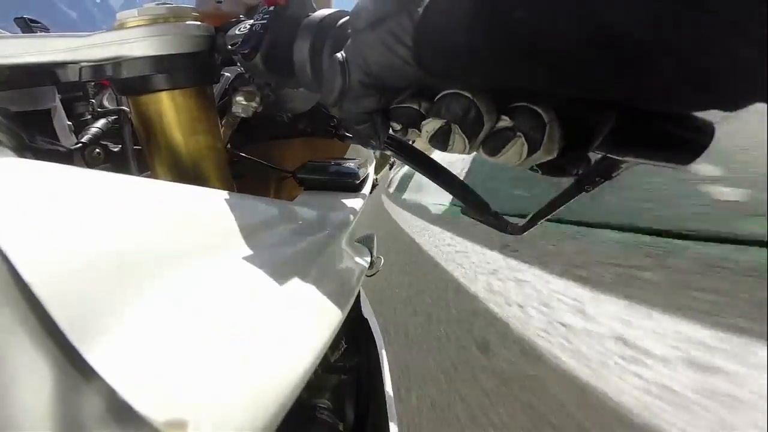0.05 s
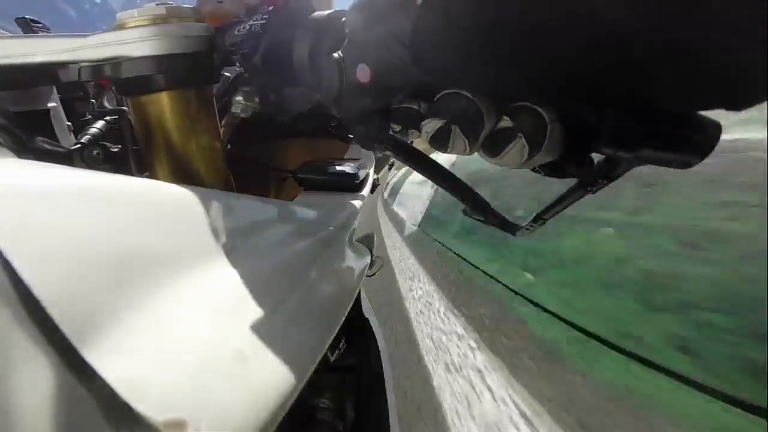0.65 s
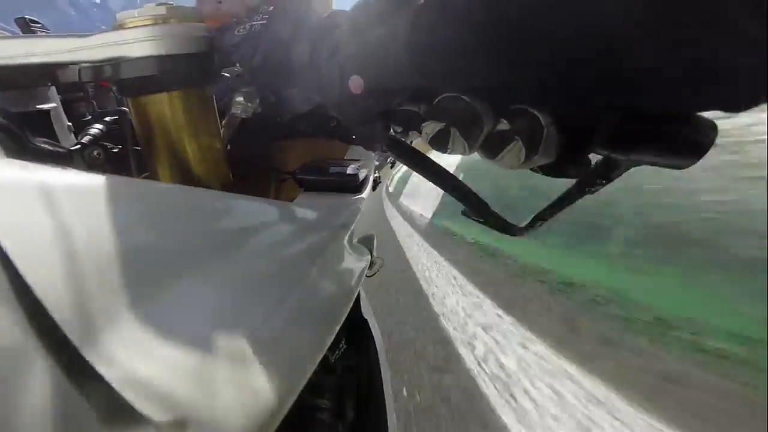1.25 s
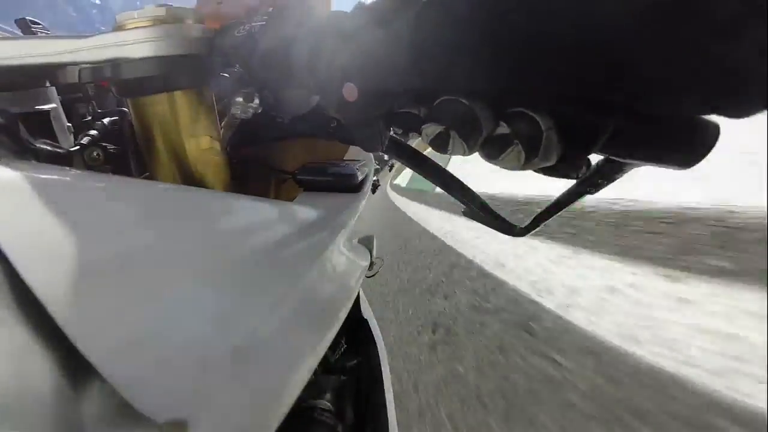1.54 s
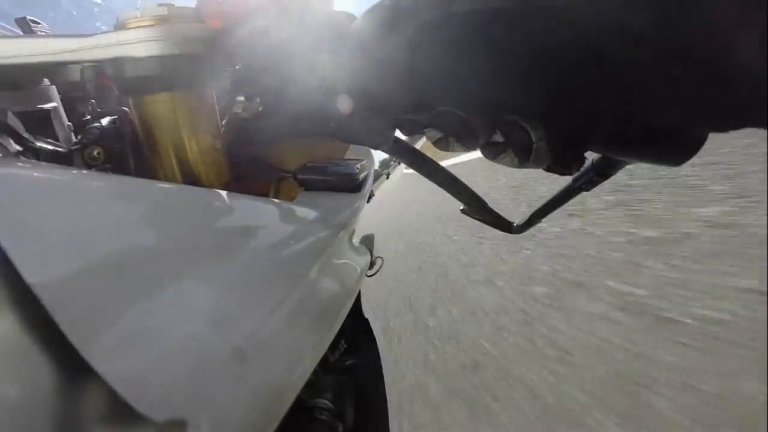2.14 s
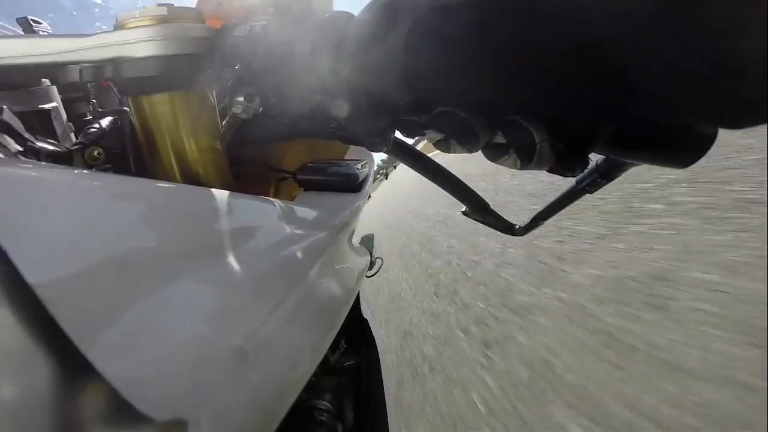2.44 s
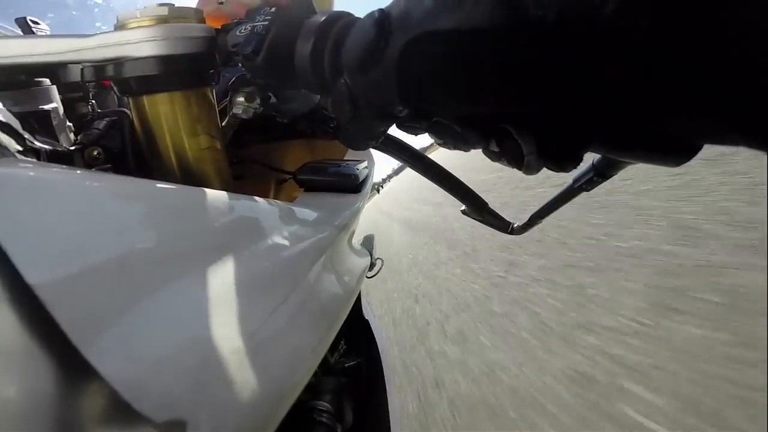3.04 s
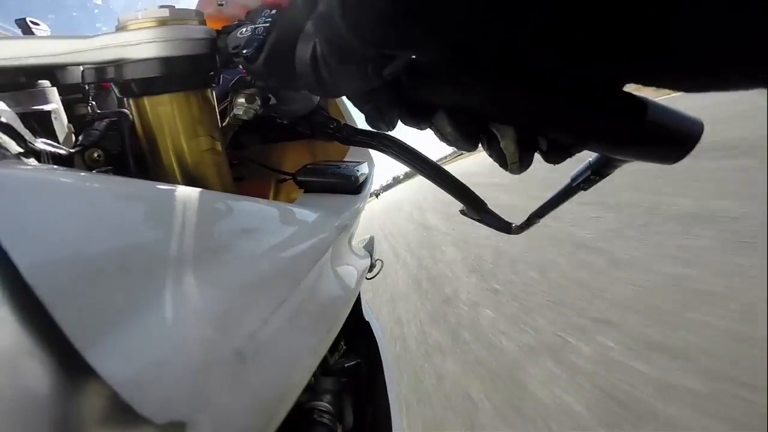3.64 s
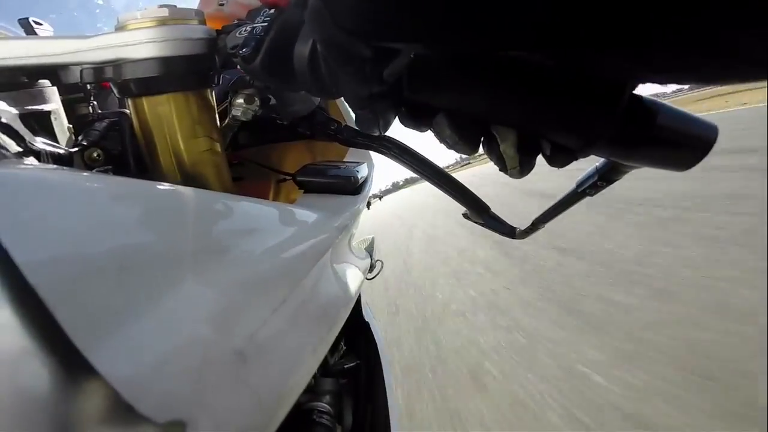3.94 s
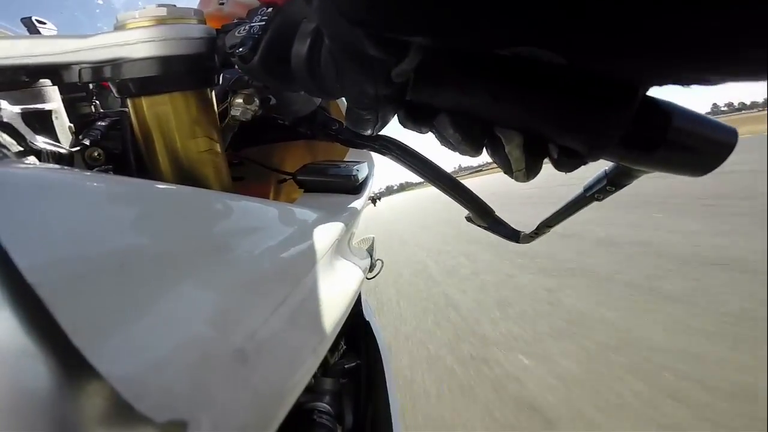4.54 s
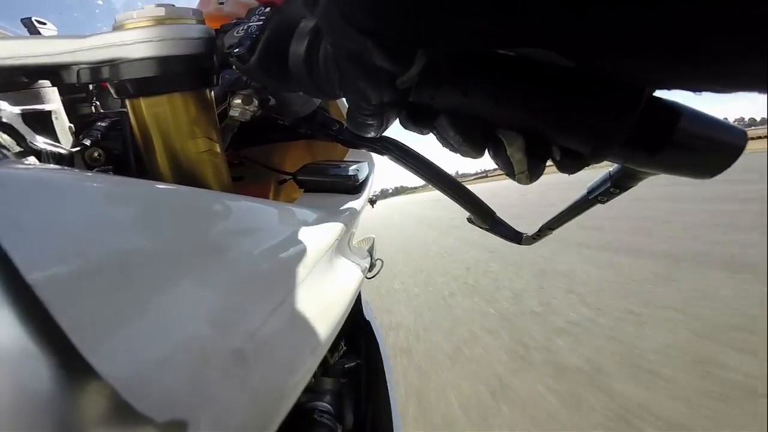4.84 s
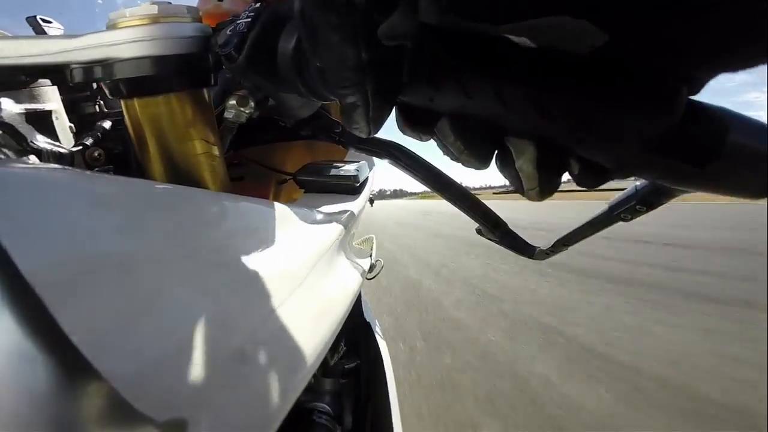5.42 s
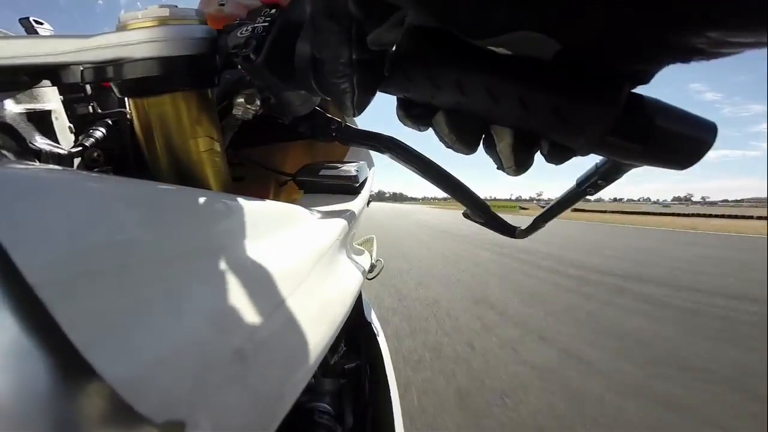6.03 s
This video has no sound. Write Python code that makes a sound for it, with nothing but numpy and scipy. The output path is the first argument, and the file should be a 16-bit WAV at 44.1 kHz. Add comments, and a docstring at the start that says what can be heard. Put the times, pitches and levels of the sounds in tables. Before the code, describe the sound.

On-board sound of a four-cylinder race bike opening up out of a corner, with gear whine, rising revs, a barking upshift and growing wind.

```python
"""A four-cylinder racing motorcycle, heard from its fairing, opens up out of a corner.
It starts on light throttle: valves and gears clatter, and the chassis knocks beside the kerb.
Near 2 s the gears sing as the drive takes up; by 3.3 s the throttle is wide, the airbox howls and rasps,
and wind buffets the microphone. Near 5 s comes one upshift: a dip, a rough bark, and the revs climb again.
A fast limiter holds the peaks down throughout."""
import sys
import numpy as np
from scipy import signal
from scipy.fft import rfft, irfft, next_fast_len
from scipy.io import wavfile
from scipy.ndimage import uniform_filter1d, minimum_filter1d

SR = 44100
rng = np.random.default_rng(int(sys.argv[2]) if len(sys.argv) > 2 else 0)


def log_audio(samples):
    """Write samples as a 16-bit WAV file to the path given in sys.argv[1]."""
    # one column per channel
    frames = np.atleast_2d(samples).T
    # limit to full scale, then quantise
    limited = np.clip(frames, -1, 1)
    pcm = np.round(limited * 32767).astype(np.int16)
    wavfile.write(sys.argv[1], SR, pcm)


N = 276948

# Sub-bass shake of the frame. Each row: frequency in Hz, relative level in dB.
SHAKE_SPECTRUM = [(8, -30), (25, 2.5), (38, 9.5), (55, 1), (110, -49)]
# Chassis knocks beside the kerb. Each row: start in seconds, level in dB.
KNOCKS = [(.241, -17.5), (.832, -20), (.899, -21)]
# Wind bed, building as the bike stands up and gathers speed. Each row: time in seconds, level in dB.
WIND_LEVEL = [(0, -44), (2.5, -47.5), (3.0, -37), (3.45, -31), (4.7, -25.5), (5.25, -30.5), (6.28, -21.5)]
# Single gusts. Each row: start in seconds, level in dB, decay in seconds.
GUSTS = [(0.24, -29, .011), (1.3, -33, .014), (2.8, -32, .014), (2.94, -28, .015), (3.115, -24, .014),
         (3.4, -28, .05), (3.77, -26, .05), (4.13, -26, .04), (5.97, -22, .03)]
# Dark rumble of air on the microphone. Each row: frequency in Hz, relative level in dB.
WIND_SPECTRUM = [(12, -26.5), (30, -3.5), (60, -2), (100, 0), (200, -1), (350, -4.5), (600, -4.5),
                 (1200, -11), (3000, -61.5)]

# The revs. Each row: time in seconds, four-stroke cycles per second.
REVS = [(0.0, 73.9), (0.05, 73.2), (0.75, 74.9), (0.82, 74.2), (0.96, 76.1), (1.01, 74.2), (1.31, 77.1),
        (1.36, 75.9), (1.94, 80.1), (2.17, 79.5), (2.26, 82.0), (2.4, 82.7), (2.48, 85.2), (2.69, 84.9),
        (2.8, 86.3), (2.97, 90.9), (3.02, 89.9), (3.55, 94.6), (3.58, 95.9), (3.88, 95.7), (4.91, 105.2),
        (5.02, 91.8), (5.05, 93.5), (5.25, 94.2), (6.03, 101.1), (6.28, 102.6)]
# The rider's hand. Each row: time in seconds, throttle from 0 to 1, roughness from 0 to 1.
THROTTLE = [(0, 0.07, 0.61), (1.15, .05, .43), (1.9, 0.28, 0.54), (2.15, 0.23, 0.54), (2.28, 0.45, 0.52),
            (2.52, .52, 0.56), (2.69, 0.36, 0.4), (2.92, 0.72, 0.5), (3.17, .85, 0.88), (3.32, 0.94, 0.45),
            (4.2, 0.97, 0.33), (6.28, 0.92, 0.42)]
# Fader for the engine's body and rasp. Each row: time in seconds, level in dB.
ENGINE_LEVEL = [(0, -13.5), (3.4, -13), (4.05, -12), (4.5, -11.5), (5.2, -10.5), (5.8, -11.5), (6.28, -7.5)]
# The uneven beat of the cylinders. Each entry: relative strength of one stroke in dB.
CYLINDER_DB = [3.5, 3.9, 1.9, 0.5]
# Gear whine, loudest as the drive takes up. Each row: time in seconds, level in dB.
WHINE_LEVEL = [(0, -44.5), (1.3, -46.5), (1.7, -37.5), (2.2, -37.5), (2.4, -48), (2.9, -46), (3.3, -58)]
# Notes of the meshing teeth. Each row: multiple of the cycle rate, offset from the whine level in dB.
GEAR_MESH = [(37, 5), (38, 4), (44, -2), (55, -4)]
# Fizz at the very top. Each row: frequency in Hz, relative level in dB.
CRACKLE_SPECTRUM = [(4000, -14), (7000, 2), (9000, -2), (11500, -9.5), (13000, -21.5), (15000, -31),
                    (18000, -42)]
# Bright tick of the valves. Each row: frequency in Hz, relative level in dB.
VALVE_SPECTRUM = [(2500, -16), (3100, 6), (3600, -3.5), (4300, 0), (4600, -4.5), (4950, 4.5), (5500, -8),
                  (6500, 1), (6950, -8), (7600, -22.5), (11000, -51.5), (15000, -65)]
# Ring of the engine cases. Each row: centre in Hz, width in Hz, relative level in dB.
CASE_MODES = [(654, 110, -14.5), (909, 88, -7), (1573, 214, -0.5), (1907, 190, -8.5), (2280, 340, -1),
              (2930, 227, -6.5)]
# Breathy midrange of the intake. Each row: frequency in Hz, relative level in dB.
RUSH_SPECTRUM = [(300, -20.5), (600, -22), (800, -20.5), (950, 0.5), (1130, -9), (1500, -2), (1800, -2.5),
                 (2230, 3.5), (2550, -3.5), (2800, -12), (3300, -11.5), (4200, -18), (7000, -64)]
# Noisy edge of the intake. Each row: frequency in Hz, relative level in dB.
RASP_SPECTRUM = [(2200, -18.5), (3000, 0.5), (3800, -4), (4300, -6), (4750, -2.5), (5300, -5.5),
                 (6400, -4.5), (7000, -10.5), (8000, -20.5), (12000, -39.5)]
# Pitched edge of the intake. Each row: frequency in Hz, relative level in dB.
BUZZ_SPECTRUM = [(2400, -22), (3100, 2), (3800, 3), (4250, -4), (4750, -2), (5300, -15), (5950, -13),
                 (6600, -19), (7500, -36), (12000, -60)]
# Airbox and fairing resonances the tones sweep through. Each row: centre in Hz, width in Hz, boost in dB.
AIRBOX_MODES = [(369, 26, 15.5), (577, 58, -9.5), (927.5, 42, 6), (1424, 116, 13.5), (1505, 40, 6.5),
                (1945, 143, 6), (2346, 553, 18), (2566, 214, 6.5)]
# Peaks and dips of the open intake. Each row: centre in Hz, width in Hz, full-throttle boost in dB.
OPEN_INTAKE_MODES = [(308, 12, 3), (1450, 50, 2), (2060, 90, -6), (2180, 60, 4.5), (2275, 90, 8.5),
                     (2370, 70, -12)]
# The engine's tones. Each row: multiple of the cycle rate, relative dB at shut, half and full throttle.
ENGINE_ORDERS = [(1, -48, -49.5, -42), (2, -43.5, -49.5, -43.5), (3, -41, -43.5, -37), (5, -58.5, -46, -39),
                 (6, -47.5, -49, -35), (7, -42.5, -33, -35.5), (8, -28, -32, -43), (9, -39, -40, -33),
                 (10, -36.5, -59.5, -27), (11, -54.5, -20, -33.5), (12, -35, -40, -33.5),
                 (13, -33, -45, -30), (14, -48, -43, -39), (15, -34.5, -44.5, -35), (16, -51, -37, -40),
                 (17, -43, -35.5, -29.5), (18, -46, -36, -42), (19, -53.5, -33.5, -51),
                 (20, -31, -28, -50.5), (21, -21, -55, -43), (22, -33.5, -33, -40.5), (23, -35, -40, -42),
                 (24, -32.5, -51.5, -45.5), (25, -32.5, -41, -49.5), (26, -36.5, -44.5, -48.5),
                 (27, -40, -42.5, -52.5), (28, -61, -57.5, -41), (29, -40, -49, -75), (30, -39, -49.5, -40),
                 (31, -60.5, -47.5, -45), (32, -46, -47, -50.5), (33, -49.5, -39.5, -40)]

FIRINGS = len(CYLINDER_DB)   # per cycle
CUT_S, CATCH_S = 4.946, 5.01   # the upshift: the ignition is cut, then the engine catches
WAVER_DB, WAVER_HZ = 1.32, 3.4   # each engine tone wavers in level on its own


def from_db(db):
    """Decibels to gain."""
    return 10 ** (np.asarray(db) / 20)


def unit_rms(x):
    """Scale to unit power."""
    return x / np.sqrt(np.mean(x ** 2) + 1e-20)


def running_rms(x, seconds):
    """Smooth level over a short stretch."""
    size = max(int(seconds * SR), 2)
    return np.sqrt(np.abs(uniform_filter1d(uniform_filter1d(x ** 2, size), size)) + 1e-12)


def automation(rows):
    """One curve per column after the time, drawn at every sample."""
    times, *columns = np.transpose(rows)
    return [np.interp(np.arange(N) / SR, times, column) for column in columns]


def drift(rate_hz, step=1):
    """Random wander of spread 1, changing about rate_hz times a second, at every step-th sample."""
    hop, settle = 40, 2000
    pole = np.exp(-2 * np.pi * hop * rate_hz / SR)
    noise = rng.standard_normal(N // hop + settle + 2)
    slow = signal.lfilter([1], [1, -2 * pole, pole * pole], noise)[settle:]
    return np.interp(np.arange(0, N, step) / hop, np.arange(len(slow)), unit_rms(slow))


def swell(centre_s, length_s):
    """A smooth rise from 0 to 1 and back around one instant."""
    return np.exp(-(2 * (np.arange(N) / SR - centre_s) / length_s) ** 2)


def burst(start_s, decay_s, attack_s):
    """Envelope with a straight attack and a dying tail."""
    age = np.arange(N) / SR - start_s
    return np.clip(age / attack_s, 0, 1) * np.exp(-np.maximum(age, 0) / decay_s)


def bell(hz, centre_hz, width_hz):
    """Shape of a resonance, 1 on top."""
    return 1 / (1 + (2 * (hz - centre_hz) / width_hz) ** 2)


def bandpass(x, low_hz, high_hz):
    """Keep one band."""
    return signal.sosfilt(signal.butter(2, [low_hz, high_hz], "band", fs=SR, output="sos"), x)


def colour(x, spectrum):
    """EQ by a smooth spectrum, then scale to unit power."""
    size = next_fast_len(N + SR // 10)
    hz, db = np.transpose(spectrum)
    bin_hz = np.maximum(np.arange(size // 2 + 1) * SR / size, 1)
    gain = from_db(np.interp(np.log(bin_hz), np.log(hz), db))
    return unit_rms(irfft(rfft(x, size) * gain, size)[:N])


def chassis():
    """The frame shakes all the time and thuds over bumps."""
    shake = from_db(-47) * colour(rng.standard_normal(N), SHAKE_SPECTRUM)
    thud = unit_rms(bandpass(rng.standard_normal(N), low_hz=80, high_hz=550))
    knocks = sum(from_db(db) * burst(start, decay_s=0.008, attack_s=0.0012) for start, db in KNOCKS)
    return shake + thud * knocks


def wind(swing_db=2, swing_hz=7.7):
    """Eddies rumble and thump on the microphone port."""
    bed_db, = automation(WIND_LEVEL)
    bed = from_db(bed_db + swing_db * drift(swing_hz))
    gusts = sum(from_db(db) * burst(start, decay, attack_s=0.0024) for start, db, decay in GUSTS)
    return (bed + gusts) * colour(rng.standard_normal(N), WIND_SPECTRUM)


def gear_whine(cycle, wobble_rad=0.99, wobble_hz=16):
    """Meshing teeth sing, wavering with the lash."""
    whine_db, = automation(WHINE_LEVEL)
    whine = 0
    for teeth, db in GEAR_MESH:
        phase = 2 * np.pi * teeth * cycle + wobble_rad * drift(wobble_hz)
        whine = whine + from_db(whine_db + db) * np.sqrt(2) * np.sin(phase)
    return whine


def crackle(cycle_hz, top_db=-44, db_per_hz=0.58, patchy_db=3.5):
    """A fine crackle on top of the rasp grows with the revs."""
    grains = rng.standard_normal(N) * from_db(patchy_db * drift(rate_hz=150))
    level_db = top_db + db_per_hz * (cycle_hz - cycle_hz.max())
    return from_db(level_db) * colour(grains, CRACKLE_SPECTRUM)


def stroke_noise(cycle, sharpness, depth=1):
    """Noise that pulses once per firing, each pulse weighted by its cylinder."""
    firing = cycle * FIRINGS
    strength = from_db(CYLINDER_DB)[firing.astype(int) % FIRINGS]
    pulse = np.exp(sharpness * (np.sin(np.pi * firing) ** 2 - 1))
    return rng.standard_normal(N) * (strength * pulse) ** depth


def valve_tick(cycle):
    """The valve train ticks brightly on every stroke."""
    return colour(stroke_noise(cycle, sharpness=0.95, depth=0.7), VALVE_SPECTRUM)


def case_clatter(cycle, accent=0.16):
    """Valves and gear teeth knock on the cases, hardest once in each cycle."""
    knocks = stroke_noise(cycle, sharpness=0.42) * np.exp(accent * np.cos(2 * np.pi * cycle))
    ring = sum(from_db(db) * bandpass(knocks, hz - width / 2, hz + width / 2)
               for hz, width, db in CASE_MODES)
    return unit_rms(ring)


def intake_rush(cycle):
    """Air rushes into the intake, one gulp per stroke."""
    return colour(stroke_noise(cycle, sharpness=0.99), RUSH_SPECTRUM)


def intake_rasp(cycle, partials=128, spread_db=2.5):
    """The intake's edge: bright noise on every stroke, plus a buzz that repeats every cycle."""
    hiss = colour(stroke_noise(cycle, sharpness=1.0, depth=0.7), RASP_SPECTRUM)
    strengths = from_db(rng.normal(0, spread_db, partials))
    wavetable = irfft(strengths * np.exp(2j * np.pi * rng.random(partials)), n=2048)
    buzz = np.interp(cycle % 1, np.linspace(0, 1, len(wavetable)), wavetable)
    return from_db(-2.5) * hiss + from_db(0.7) * colour(buzz, BUZZ_SPECTRUM)


def firing_note(cycle, cycle_hz, throttle, shut_db=-51, open_boost_db=26, boom_db=8.5):
    """The intake strokes merge into one low note that booms across the lowest airbox resonance."""
    surge_db = 3.5 * burst(CATCH_S, decay_s=0.38, attack_s=0.14)   # extra weight after the shift
    db = shut_db + open_boost_db * throttle + surge_db + WAVER_DB * drift(WAVER_HZ)
    db += boom_db * bell(FIRINGS * cycle_hz, centre_hz=357, width_hz=60)
    return from_db(db) * np.sqrt(2) * np.sin(2 * np.pi * FIRINGS * cycle)


def airbox_howl(cycle, cycle_hz, throttle, rough, bark):
    """Engine orders swell as they cross the resonances; uneven cycles and gear lash blur the high ones."""
    flutter_hz, lash_hz, blur_hz, bark_db = 14.7, 23.8, 2310, 25
    step = 5   # these tones fit in a fifth of the sample rate
    cycle, cycle_hz, throttle, rough, bark = (c[::step] for c in (cycle, cycle_hz, throttle, rough, bark))
    slack = 1 - throttle
    howl = 0
    for order, *levels_db in ENGINE_ORDERS:
        hz = order * cycle_hz
        db = np.interp(throttle, [0, 0.5, 1], levels_db)
        db += sum(boost * bell(hz, centre, width) for centre, width, boost in AIRBOX_MODES)
        db += throttle * sum(boost * bell(hz, centre, width) for centre, width, boost in OPEN_INTAKE_MODES)
        db += bark * bark_db * bell(hz, centre_hz=1815, width_hz=90)
        db += WAVER_DB * drift(WAVER_HZ, step)
        # on light throttle neighbouring orders add up to one throb a cycle; under load they spread out
        lag = 0.018 * order ** 2 + (0.35 + throttle / 2) * rng.uniform(-0.84, 1) / 2
        # with the drive slack, the gears rattle quickly and the cycles alternate
        rattle = drift(lash_hz, step)
        alternation = 0.5 * np.cos(np.pi * cycle + 2 * np.pi * rng.random())
        lash = slack * (rattle + alternation)
        blur = rough * hz / blur_hz
        phase = 2 * np.pi * (order * cycle - lag) + blur * (drift(flutter_hz, step) + lash)
        flutter = 1 + blur * drift(flutter_hz, step) / 2
        howl = howl + from_db(db) * np.sqrt(2) * flutter * np.sin(phase)
    return signal.resample_poly(howl, step, 1)[:N]


def engine(hunt_share=0.00399, hunt_hz=6.94):
    """The throttle crossfades mechanical clatter into the rush and rasp of the intake, under the howl."""
    cycle_hz, = automation(REVS)
    throttle, rough = np.clip(automation(THROTTLE), 0, 1)
    cycle_hz *= 1 + hunt_share * (1 - throttle) * drift(hunt_hz)   # the revs waver on light throttle
    cycle = np.cumsum(cycle_hz) / SR
    opened, closed = np.sqrt(throttle), np.sqrt(1 - throttle)

    cut_db = -6 * swell(CUT_S, length_s=0.057)
    bark = swell(CATCH_S, length_s=0.18)
    rough = rough + 0.84 * bark
    engine_db = automation(ENGINE_LEVEL)[0] + cut_db

    howl = airbox_howl(cycle, cycle_hz, throttle, rough, bark)
    clatter = from_db(-12) * closed * case_clatter(cycle)
    rush = from_db(-10.5) * opened * intake_rush(cycle)
    body = howl + rough * (clatter + rush)
    body = from_db(engine_db) * body / running_rms(body, seconds=0.094)   # levelled, then faded

    valves = from_db(1) * closed * valve_tick(cycle)
    rasp = opened * intake_rasp(cycle)
    edge_db = engine_db - 22.5 + 5 * throttle ** 1.6   # bites late in the throttle's travel
    treble = from_db(edge_db) * (valves + rasp) + gear_whine(cycle)
    return body + treble + firing_note(cycle, cycle_hz, throttle) + from_db(cut_db) * crackle(cycle_hz)


def scene():
    """The engine up front, wind and chassis behind it, in mono."""
    return (engine() + wind() + chassis())[None]


def record(dry, ceiling=0.62, hold_s=0.00097, cutoff_hz=15100):
    """A fast limiter ducks the peaks; a steep low-pass trims the top."""
    size = int(hold_s * SR)
    gain = minimum_filter1d(np.minimum(1, ceiling / (np.abs(dry) + 1e-9)), 2 * size)
    limited = dry * uniform_filter1d(uniform_filter1d(gain, size), size)
    return signal.sosfilt(signal.ellip(10, 0.1, 80, cutoff_hz, fs=SR, output="sos"), limited)


dry = scene()
out = record(dry)
log_audio(out)
```